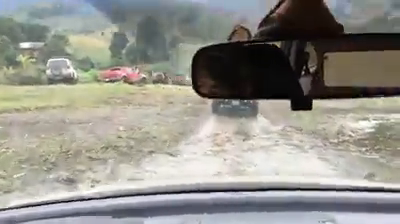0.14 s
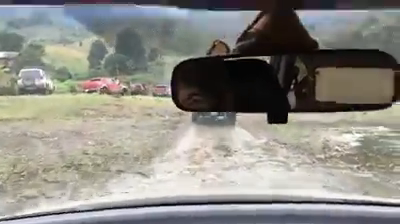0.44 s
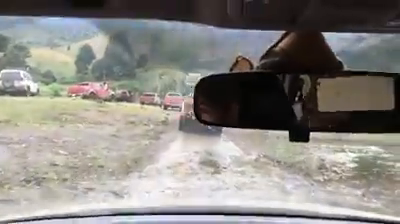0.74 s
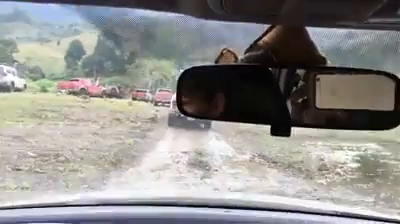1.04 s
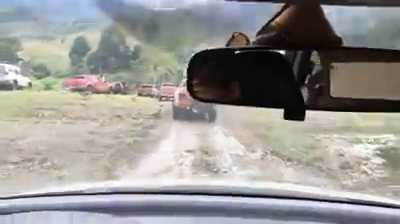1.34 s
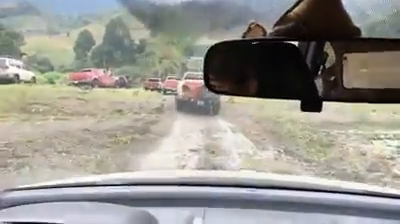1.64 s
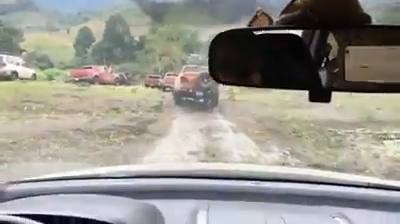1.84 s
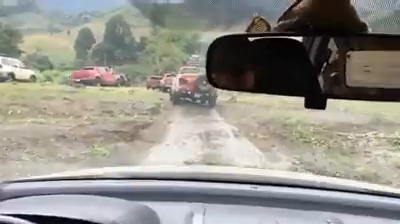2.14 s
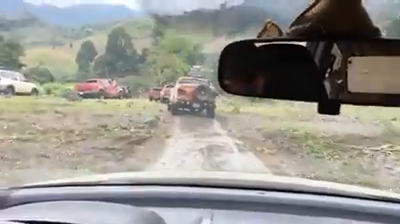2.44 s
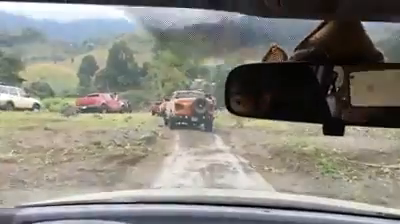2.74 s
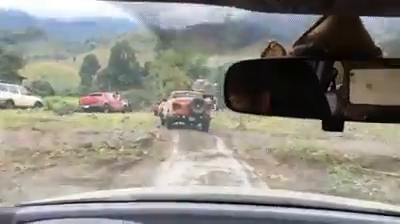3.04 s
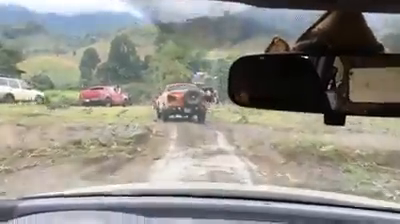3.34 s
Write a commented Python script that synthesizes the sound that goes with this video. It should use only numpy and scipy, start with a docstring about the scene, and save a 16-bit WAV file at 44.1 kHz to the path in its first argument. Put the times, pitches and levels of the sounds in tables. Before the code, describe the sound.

Pickup truck engine throbs in the cab as it crawls over a muddy, rutted dirt track

```python
"""Inside the cab of a pickup truck crawling along a muddy, rutted track.
From the start: engine throb and clatter (pulses and noise per firing), body boom (noise in two bass bands)
and tyres in mud (noise and random impacts). Soon grit ticks (filtered bursts), loose trim knocks and ruts
thump (ringing modes). Around halfway the mud grows louder and its spray swells; then it dies away."""
import sys
import numpy as np
from scipy import signal
from scipy.fft import rfft, irfft
from scipy.io import wavfile
from scipy.ndimage import uniform_filter1d, minimum_filter1d

SR = 44100
rng = np.random.default_rng(int(sys.argv[2]) if len(sys.argv) > 2 else 0)


def file_out(sig):
    """Save sig as 16-bit WAV at sys.argv[1]."""
    # one column per channel
    cols = np.atleast_2d(sig).T
    # limit, then scale
    lim = np.clip(cols, -1, 1)
    pcm = np.round(lim * 32767).astype(np.int16)
    wavfile.write(sys.argv[1], SR, pcm)


N = 154350

# Engine speed before wander: t/s, firing rate/Hz
FIRING_RATE = [(0, 49.5), (.6, 50), (1.3, 49.7), (2.7, 48.5), (3.5, 49)]
# Exhaust spectrum in the cab: f/Hz, relative level/dB
EXHAUST_SPECTRUM = [(25, -83), (45, 9.5), (90, -0.5), (130, 0.5), (180, -8.5), (280, -11.5), (450, -39),
                    (900, -64)]
# Combustion clatter through the bulkhead: f/Hz, relative level/dB
CLATTER_SPECTRUM = [(250, 11), (400, 0.5), (550, 7), (800, 4), (1100, 5), (1350, 0), (1750, 1.5), (2100, 0),
                    (2600, -4.5), (4000, -8), (8000, -21.5), (15000, -57)]
EXHAUST_DB, CLATTER_DB = -35, -50
FIRING_SCATTER_DB, LOPE_DB = 3, 1.5  # lope: clatter alternates +/- LOPE_DB
REV_WANDER_FRACTION, CLATTER_DECAY_CYCLES = .015, 1.8

# Boom of the body on rough ground: f/Hz, relative level/dB
BOOM_SPECTRUM = [(16, -39), (24, -6.5), (30, -2), (38, 0), (52, 1), (68, -6.5), (82, -3.5), (100, -7),
                 (128, -7), (150, -15.5), (200, -21), (230, -26.5), (295, -28), (335, -40.5), (400, -36.5),
                 (460, -48), (1200, -83)]
# Deep bass before DEEP_OFFSET_DB: t/s, level/dB
DEEP_LEVEL_DB = [(0, -27), (.17, -21.5), (.33, -25), (.47, -18), (.7, -24), (.79, -19.5), (.89, -23),
                 (1.09, -15.5), (1.26, -27.5), (1.37, -12), (1.5, -19), (1.65, -17.5), (1.74, -27),
                 (1.86, -18), (1.97, -17.5), (2.02, -24), (2.11, -18), (2.25, -24.5), (2.54, -16),
                 (2.72, -27.5), (2.84, -13), (2.95, -25.5), (3.06, -22.5), (3.2, -22.5), (3.5, -30)]
# Upper bass before UPPER_OFFSET_DB: t/s, level/dB
UPPER_LEVEL_DB = [(0, -21.5), (.1, -27), (.21, -21), (.33, -25), (.47, -28), (.68, -27.5), (.83, -25.5),
                  (.98, -27), (1.13, -20.5), (1.34, -23.5), (1.45, -31), (1.62, -23), (1.95, -27),
                  (2.12, -23), (2.24, -26), (2.48, -25.5), (2.74, -31), (2.87, -25.5), (3.1, -29),
                  (3.5, -27.5)]
BOOM_SPLIT_HZ, DEEP_OFFSET_DB, UPPER_OFFSET_DB = 68.4, -3, -1.5

# Tyres in mud, before offsets and flicker: t/s, churn level/dB, spray level/dB
MUD_LEVELS_DB = [(0, -51.5, -56.5), (.2, -51.5, -61.5), (.6, -51.5, -60), (.8, -48.5, -53.5),
                 (.9, -47, -57.5), (1.08, -44, -52.5), (1.25, -44.5, -52.5), (1.45, -44.5, -54),
                 (1.63, -44.5, -51), (1.74, -47, -53), (1.97, -41.5, -51.5), (2.1, -45.5, -49.5),
                 (2.3, -47, -49.5), (2.43, -46, -54), (2.68, -48, -52.5), (2.85, -51.5, -57),
                 (3.1, -51, -58.5), (3.3, -49.5, -60.5), (3.5, -56.5, -59)]
# Churning mud: f/Hz, relative level/dB
CHURN_SPECTRUM = [(150, -23), (350, -5), (470, -2.5), (560, -1), (700, -2.5), (850, -8), (1080, -3.5),
                  (1280, -3), (1700, -1), (2100, -2), (2600, -12), (3500, -15), (6000, -45)]
# Spray, steady hiss and drops alike: f/Hz, relative level/dB
SPRAY_SPECTRUM = [(1200, -29), (2200, 0.5), (3300, 2.5), (4300, 0.5), (4900, -3.5), (5600, 0.5), (6600, -1),
                  (7700, -5), (9500, -5.5), (10300, -10.5), (11500, -8.5), (13000, -12), (15700, -14)]
# Floor and wheel arches: f/Hz, relative level/dB, t60/s
FLOOR_MODES = [(400, 4, 0.031), (547, -4.5, 0.097), (730, -18, 0.032), (939, -3, 0.089), (1087, 2, 0.035),
               (1237, -8, 0.073), (1463, -8, 0.084), (1708, -3, 0.058), (2055, -2, 0.023),
               (2444, -7.5, 0.069)]
# Spray swells as tyres run through puddles: t/s, rise of level/dB, length/s
SPLASH_SWELLS = [(1.385, 2.5, 0.061), (1.5, 2.5, .12), (1.626, 2.5, .07)]
CHURN_OFFSET_DB, PANEL_DB, SPRAY_OFFSET_DB, DROPS_DB = -2.5, -5, -0.5, -9
CHURN_FLICKER_DB, SPRAY_FLICKER_DB = 0.92, 1
CLODS_DB, CLODS_PER_S, CLOD_SPREAD_DB, CLOD_T60_S = -4.5, 170, 0.9, .02
DROPS_PER_S, DROP_SPREAD_DB = 700, 5

# Grit and mud ticking on the body: t/s, level/dB, t60/s, tilt/(dB per octave)
TICK_EVENTS = [(.047, -63, 0.093, 10), (.256, -46.5, .05, 2.5), (.297, -36.5, 0.039, -3.5),
               (.332, -43.5, 0.082, 0.5), (.464, -56, 0.024, 7), (.548, -53, .04, 5),
               (.737, -36, 0.19, -6.5), (0.932, -43, 0.084, 4.5), (.956, -52, .1, 11),
               (1.07, -35, 0.15, -6), (1.176, -41, .025, 4), (1.216, -43, 0.12, -1),
               (1.274, -56, 0.086, -5), (2.008, -46, 0.15, 12), (2.948, -39.5, .05, -7),
               (3.087, -49, 0.054, -2)]
# Tick before tilt: f/Hz, relative level/dB
TICK_SPECTRUM = [(400, 5.5), (1000, 6.5), (1700, 6), (3200, 0), (4900, -9.5), (6200, -9), (9000, -21),
                 (15000, -35)]
TICK_ATTACK_S = .007
GRAIN_SHARE, GRAINS_PER_S, GRAIN_SPREAD_DB = .2, 2000, 2  # share is of power, in ticks and knocks

# Loose trim knocking and scraping: t/s, level/dB, rise/s, t60/s, tilt/(dB per octave)
KNOCK_EVENTS = [(.135, -44.5, 0.0086, 0.065, 8), (.175, -43, 0.0098, 0.14, -8), (.731, -46, 0.015, 0.1, -5),
                (.77, -45, 0.01, 0.066, 1), (1.04, -33, 0.0068, 0.063, -11.5), (1.064, -41, 0.0092, .14, 2),
                (1.521, -40.5, .008, .06, 10), (1.645, -36, .016, .09, -10.5),
                (2.001, -28.5, 0.0073, .075, -1.5), (2.025, -41.5, .007, 0.22, 3),
                (2.372, -35.5, .014, 0.072, -0.5)]
# Loose trim resonances: f/Hz, relative level/dB, t60/s
TRIM_RESONANCES = [(562, -2, 0.095), (600, -3, 0.056), (685, 2.5, .035), (773, 3.5, 0.035), (844, 2, .018),
                   (930, -6, 0.024), (1023, 1.5, 0.033), (1254, -3.5, 0.03), (1670, -12, .01)]
# Softness of the trim contact, before tilt: f/Hz, relative level/dB
KNOCK_SPECTRUM = [(150, -6), (450, 0), (700, 2.5), (1200, 5.5), (2000, 0.5), (5000, -19)]
SCRAPE_DB = -4.5  # relative to the trim ringing

# Ruts thumping the suspension: t/s, peak level/dB, most excited f/Hz, t60/s
THUMP_EVENTS = [(.185, -13, 87, .14), (.228, -28.5, 180, 0.24), (0.331, -23, 225, 0.077),
                (0.411, -14, 66, 0.38), (0.437, -12, 119, 0.57), (0.782, -20.5, 195, 0.22),
                (0.826, -23, 172, 0.11), (1.105, -21, 104, 0.11), (1.145, -16, 178, 0.066),
                (1.202, -19, 110, 0.27), (1.285, -8, 129, 0.18), (1.53, -14, 110, 0.045),
                (1.596, -22.5, 202, 0.18), (1.679, -15.5, 110, 0.06), (1.83, -18, 113, 0.11),
                (2.005, -9, 161, 0.17), (2.024, -18.5, 124, 0.085), (2.043, -16.5, 206, 0.12),
                (2.464, -20.5, 186, 0.17), (2.636, -18, 105, 0.14), (2.878, -19.5, 87, 0.095),
                (2.916, -13.5, 139, 0.044), (2.959, -6.5, 92, 0.19)]
# Cab resonances before detuning: f/Hz, relative level/dB
CAB_RESONANCES = [(60, 9.5), (76, 3.5), (87, 2), (110, 6), (130, 7), (152, -3), (178, 2), (200, -1.5),
                  (228, -7), (285, -1.5)]
THUMP_FOCUS_DB = 21  # loss one octave from the excited f; grows as octaves squared
THUMP_RISE_S, THUMP_DETUNE_FRACTION = 0.00561, 0.029  # the springs soften each blow

LOW_CUT_HZ, TOP_HZ = 20, 15700
LIMIT_DB, LIMIT_HOLD_S, FADE_IN_S = -9.2, .02, .008


def undb(db):
    """Decibels to gain."""
    return 10 ** (np.asarray(db) / 20)


def unit(x):
    """Scale to rms 1."""
    return x / np.sqrt(np.mean(x ** 2))


def curve(table, axis=1):
    """One column of a time table, joined by straight lines."""
    rows = np.array(table)
    return np.interp(np.arange(N) / SR, rows[:, 0], rows[:, axis])


def colour(x, points, tilt_db=0):
    """Filter by (f/Hz, level/dB) points plus a tilt per octave from the first point; rms 1."""
    octave = np.log2(np.maximum(np.arange(N // 2 + 1) * SR / N, 1))
    hz, db = np.array(points).T
    tilted_db = db + tilt_db * np.log2(hz / hz[0])
    gain = undb(np.interp(octave, np.log2(hz), tilted_db))
    return unit(irfft(rfft(x) * gain, N))


def noise():
    """White noise."""
    return rng.standard_normal(N)


def walk(points_per_s):
    """Random wander in straight segments, spread near 1."""
    points = rng.standard_normal(1000)
    return 1.2 * np.interp(np.arange(N) / SR * points_per_s, np.arange(1000), points)


def ringing(modes):
    """Half-second impulse response: a sum of decaying sines."""
    t = np.arange(SR // 2) / SR
    return sum(undb(db - 60 * t / t60) * np.sin(2 * np.pi * hz * t) for hz, db, t60 in modes)


def burst(start_s, rise_s, t60_s):
    """Envelope with a straight rise and an exponential fall."""
    age = np.arange(N) / SR - start_s
    fall = np.exp(-np.log(1000) * np.maximum(age - rise_s, 0) / t60_s)
    return np.clip(age / rise_s, 0, 1) * fall


def particles(per_s, spread_db):
    """Random impacts with exponentially spread dB sizes, capped at four spreads."""
    size_db = spread_db * np.minimum(rng.exponential(size=N), 4)
    return (rng.random(N) < per_s / SR) * undb(size_db)


def gritty():
    """Rough contact: fine friction noise mixed with separate grains of random sign."""
    grains = unit(particles(GRAINS_PER_S, GRAIN_SPREAD_DB) * np.sign(noise()))
    return np.sqrt(1 - GRAIN_SHARE) * noise() + np.sqrt(GRAIN_SHARE) * grains


def engine():
    """Uneven firings pulse the exhaust; each restarts a decaying clatter, alternately strong and weak."""
    rate_hz = curve(FIRING_RATE) * (1 + REV_WANDER_FRACTION * walk(6))
    cycles = np.cumsum(rate_hz) / SR
    firing = cycles.astype(int)
    size = undb(FIRING_SCATTER_DB * rng.standard_normal(size=400))[firing]
    exhaust = colour(np.diff(firing, prepend=0) * size, EXHAUST_SPECTRUM)
    lope = undb(LOPE_DB * np.cos(np.pi * firing))
    decay = np.exp(-(cycles - firing) / CLATTER_DECAY_CYCLES)
    clatter = colour(noise() * size * lope * decay, CLATTER_SPECTRUM)
    return undb(EXHAUST_DB) * exhaust + undb(CLATTER_DB) * clatter


def body():
    """Rough ground shakes the cab without pause: a deep sway and a rumble above it."""
    shake = colour(noise(), BOOM_SPECTRUM)
    deep_db = DEEP_OFFSET_DB + curve(DEEP_LEVEL_DB)
    upper_db = UPPER_OFFSET_DB + curve(UPPER_LEVEL_DB)
    out = 0
    for kind, level_db in (("low", deep_db), ("high", upper_db)):
        split = signal.butter(2, BOOM_SPLIT_HZ, kind, fs=SR, output="sos")
        band = signal.sosfiltfilt(split, shake, padtype="even")
        local_rms = np.sqrt(uniform_filter1d(band ** 2, size=5000))
        out = out + band / local_rms * undb(level_db)  # level the band, then impose its curve
    return out


def mud():
    """Tyres churn mud and crush clods, ringing the floor panels; they fling a spray of hiss and drops."""
    clod = burst(0, 1 / SR, CLOD_T60_S)
    crush = signal.fftconvolve(particles(CLODS_PER_S, CLOD_SPREAD_DB), clod)[:N]
    grind = noise() + undb(CLODS_DB) * unit(crush * noise())
    panels = unit(signal.fftconvolve(grind, ringing(FLOOR_MODES))[:N])
    churn = colour(grind, CHURN_SPECTRUM) + undb(PANEL_DB) * panels
    churn_db = curve(MUD_LEVELS_DB, axis=1) + CHURN_OFFSET_DB + CHURN_FLICKER_DB * walk(29.7)

    drops = particles(DROPS_PER_S, DROP_SPREAD_DB) * np.sign(noise())
    hiss = undb(SPRAY_OFFSET_DB) * colour(noise(), SPRAY_SPECTRUM)
    spray = hiss + undb(DROPS_DB) * colour(drops, SPRAY_SPECTRUM)
    spray_db = curve(MUD_LEVELS_DB, axis=2) + splashes() + SPRAY_FLICKER_DB * walk(21.92)
    return churn * undb(churn_db) + spray * undb(spray_db)


def ticks():
    """Grit and blobs of mud hit the body: short splats of rough contact, each with its own tilt."""
    grit = gritty()
    out = 0
    for start, db, t60, tilt in TICK_EVENTS:
        out = out + colour(grit, TICK_SPECTRUM, tilt) * undb(db) * burst(start, TICK_ATTACK_S, t60)
    return out


def knocks():
    """Loose trim scrapes and chatters: rough contact rings its modes, some pieces duller than others."""
    contact = gritty()
    ring = unit(signal.fftconvolve(contact, ringing(TRIM_RESONANCES))[:N])
    chatter = ring + undb(SCRAPE_DB) * colour(contact, KNOCK_SPECTRUM)
    out = 0
    for start, db, rise, t60, tilt in KNOCK_EVENTS:
        out = out + colour(chatter, KNOCK_SPECTRUM, tilt) * undb(db) * burst(start, rise, t60)
    return out


def thumps():
    """Each rut gives the cab a soft blow: broad ruts ring its lowest modes, sharp edges the higher ones."""
    hz, db = np.array(CAB_RESONANCES).T
    out = 0
    for start, peak_db, focus_hz, t60 in THUMP_EVENTS:
        age = np.clip(np.arange(N) / SR - start, 0, None)
        heard = (age > 0) & (age < t60)
        tuned_hz = hz * (1 + THUMP_DETUNE_FRACTION * rng.standard_normal(len(hz)))
        mode_gain = undb(db - THUMP_FOCUS_DB * np.log2(hz / focus_hz) ** 2)
        ring = np.zeros(N)
        ring[heard] = mode_gain @ np.sin(2 * np.pi * np.outer(tuned_hz, age[heard]))
        ring = ring * burst(start, THUMP_RISE_S, t60)
        out = out + undb(peak_db) * ring / np.abs(ring).max()
    return out


def splashes():
    """Puddles swell the spray: bell-shaped rises in dB."""
    t = np.arange(N) / SR
    return sum(db * np.exp(-(2 * (t - at) / length) ** 2) for at, db, length in SPLASH_SWELLS)


def scene():
    """Sum of all sources, one channel."""
    return (engine() + body() + mud() + ticks() + knocks() + thumps())[None]


def record(dry):
    """Fade in, cut the lowest bass, limit the peaks, cut the very top."""
    opened = dry * np.minimum(np.arange(N) / SR / FADE_IN_S, 1)
    low_cut = signal.butter(4, LOW_CUT_HZ, "high", fs=SR, output="sos")
    thinned = signal.sosfilt(low_cut, opened)
    hold = int(LIMIT_HOLD_S * SR)
    needed_gain = 1 / np.maximum(np.abs(thinned) / undb(LIMIT_DB), 1)
    gain = uniform_filter1d(minimum_filter1d(needed_gain, hold), hold)
    top_cut = signal.ellip(10, .2, 80, TOP_HZ, fs=SR, output="sos")
    return signal.sosfilt(top_cut, thinned * gain)


dry = scene()
out = record(dry)
file_out(out)
```